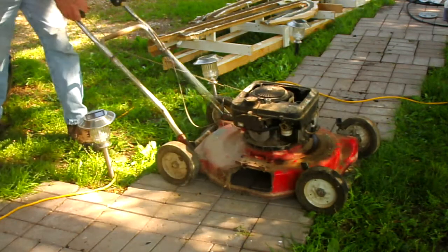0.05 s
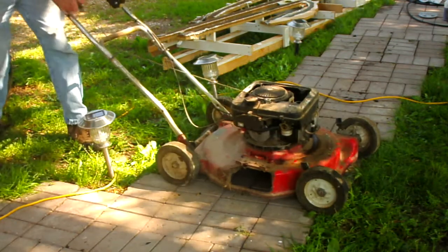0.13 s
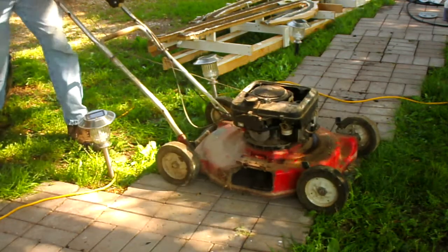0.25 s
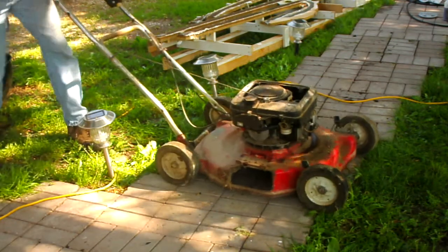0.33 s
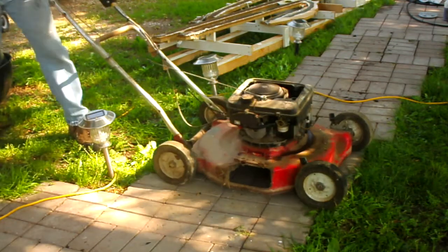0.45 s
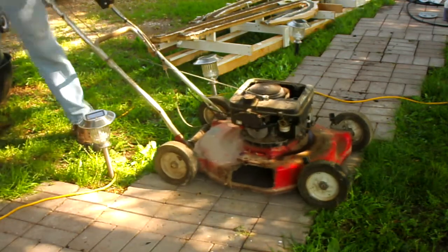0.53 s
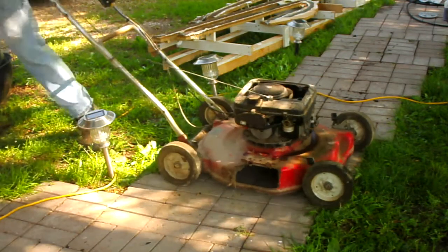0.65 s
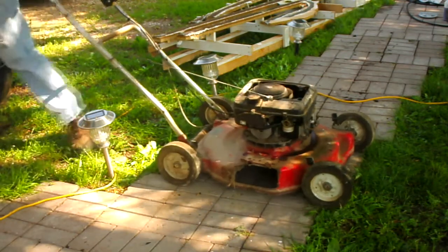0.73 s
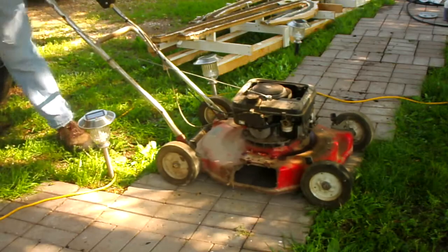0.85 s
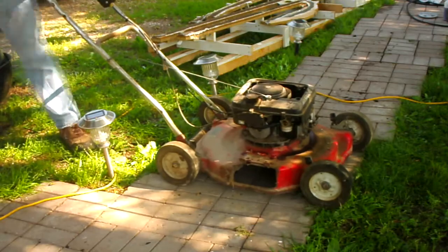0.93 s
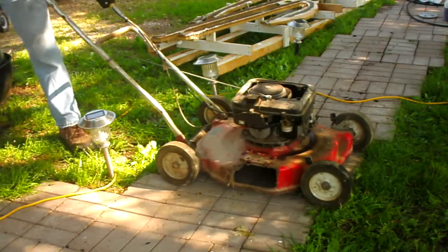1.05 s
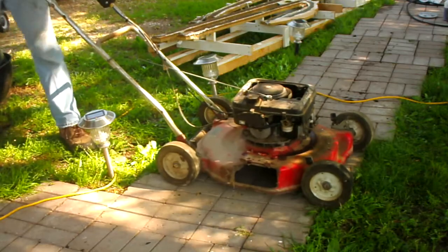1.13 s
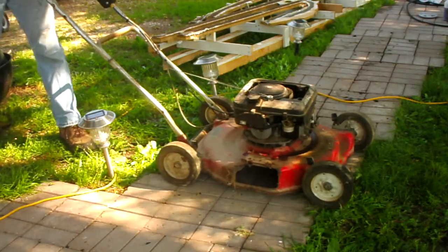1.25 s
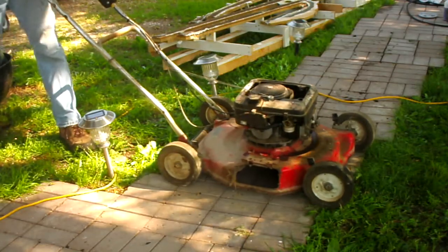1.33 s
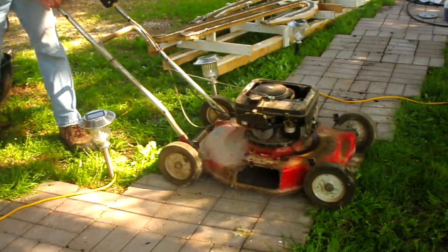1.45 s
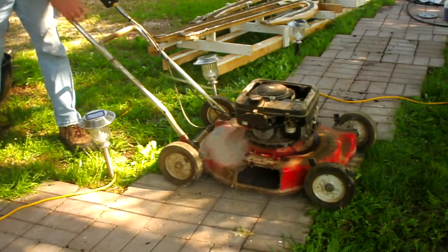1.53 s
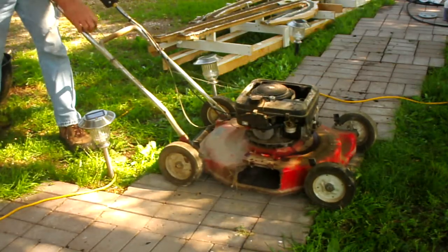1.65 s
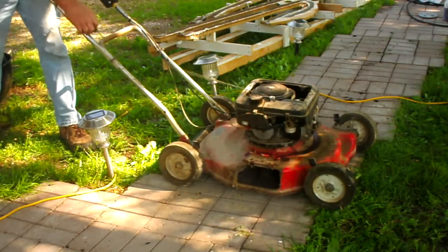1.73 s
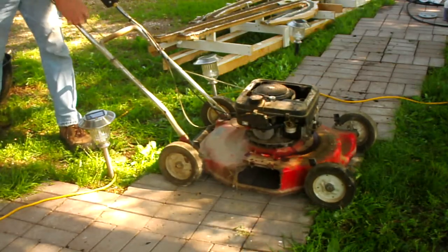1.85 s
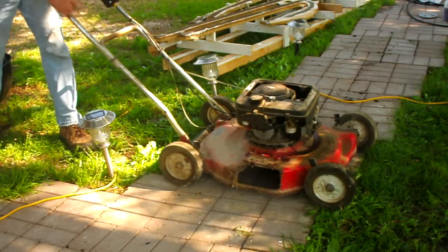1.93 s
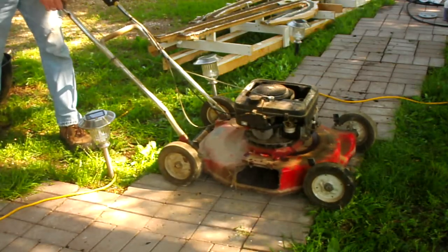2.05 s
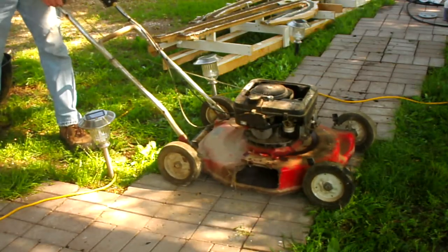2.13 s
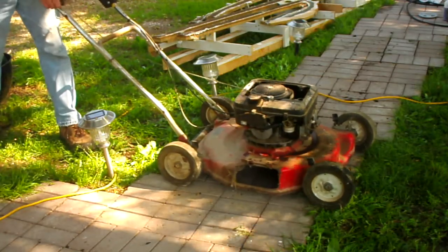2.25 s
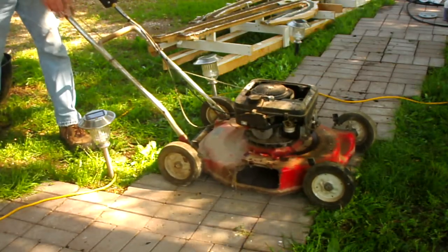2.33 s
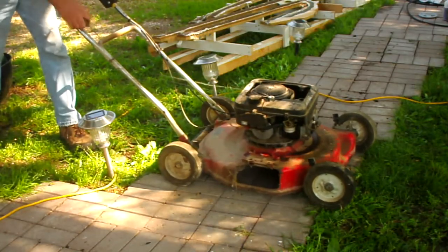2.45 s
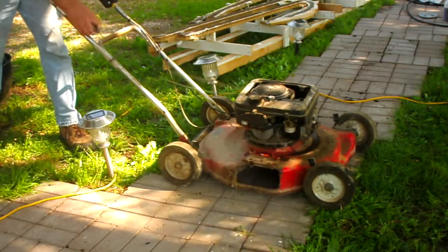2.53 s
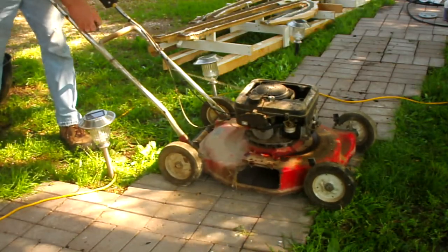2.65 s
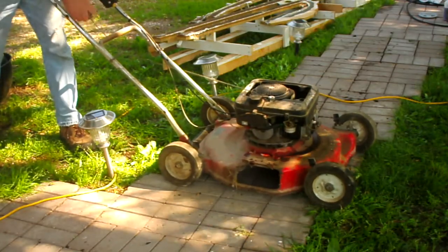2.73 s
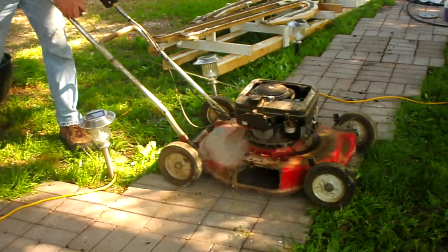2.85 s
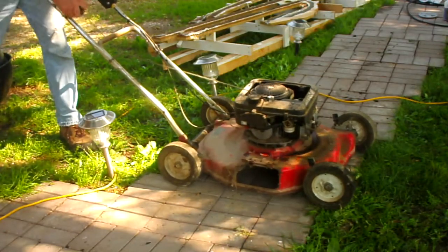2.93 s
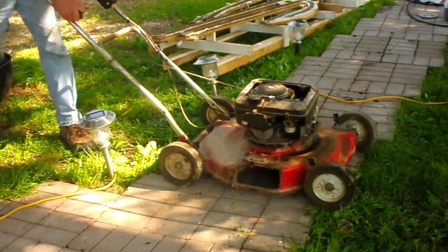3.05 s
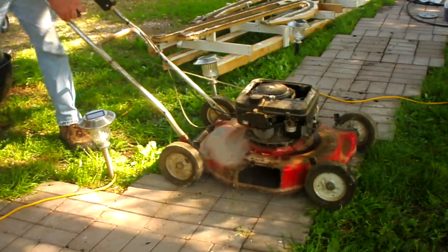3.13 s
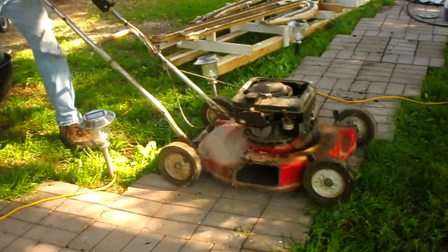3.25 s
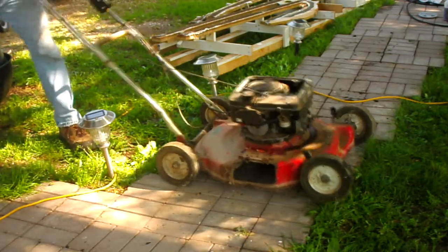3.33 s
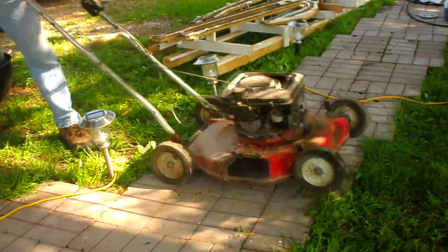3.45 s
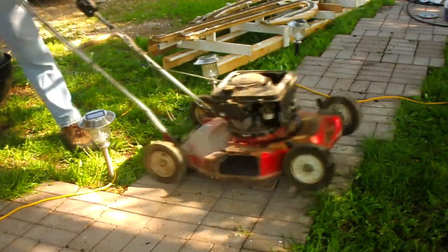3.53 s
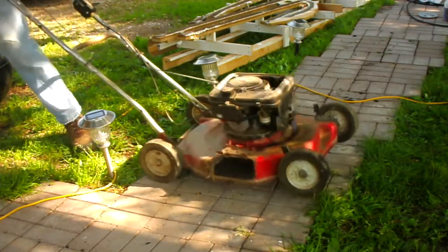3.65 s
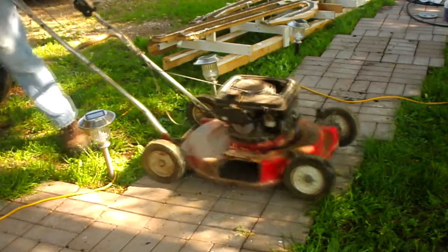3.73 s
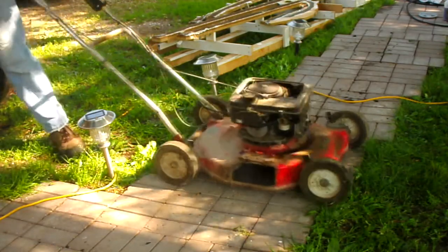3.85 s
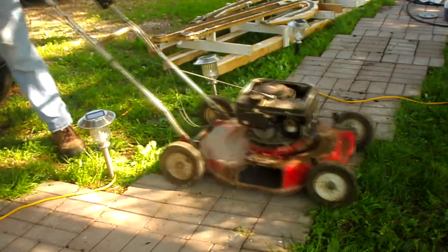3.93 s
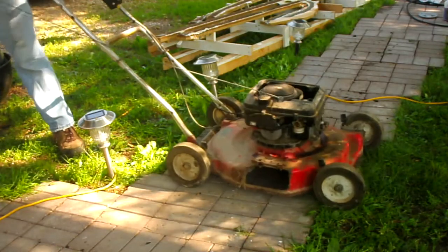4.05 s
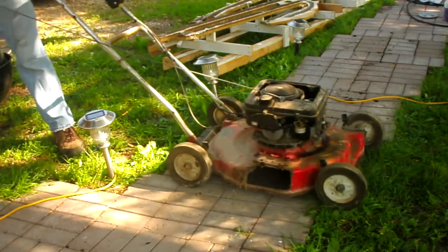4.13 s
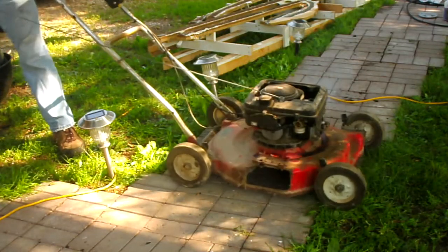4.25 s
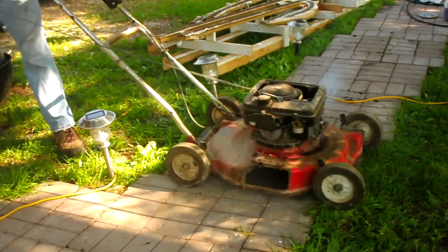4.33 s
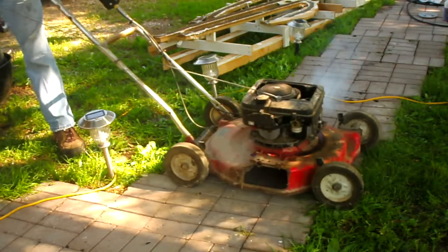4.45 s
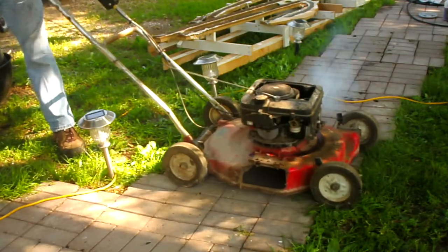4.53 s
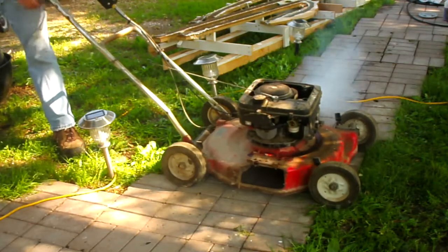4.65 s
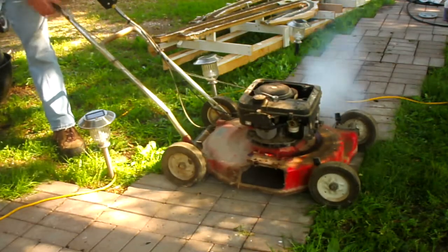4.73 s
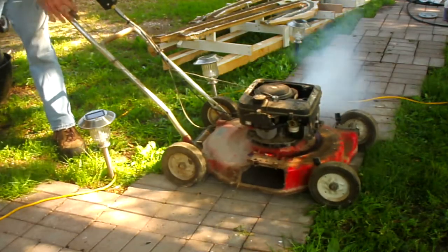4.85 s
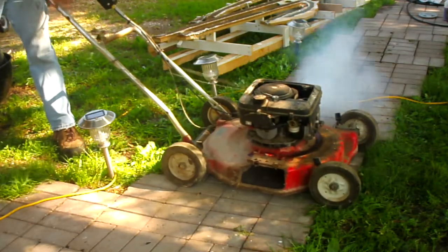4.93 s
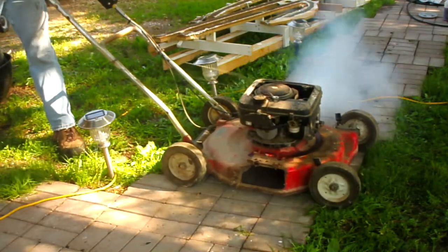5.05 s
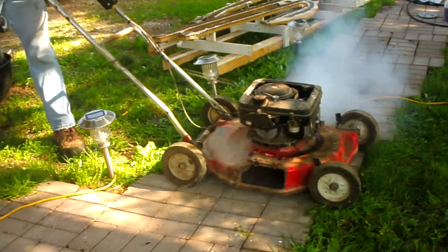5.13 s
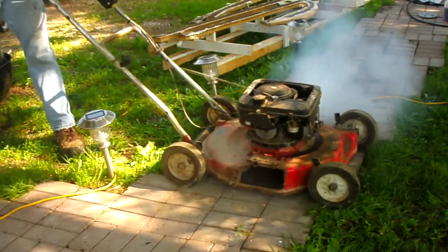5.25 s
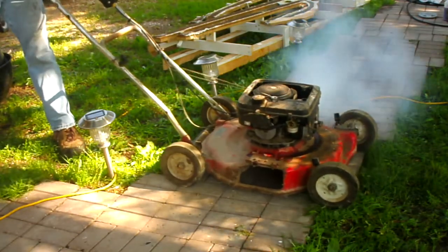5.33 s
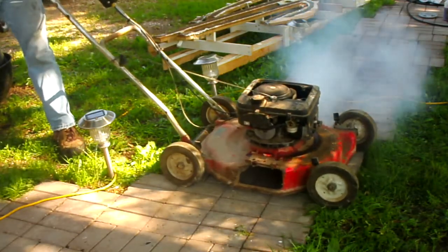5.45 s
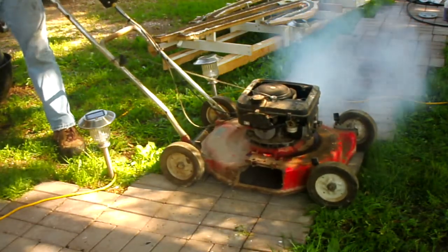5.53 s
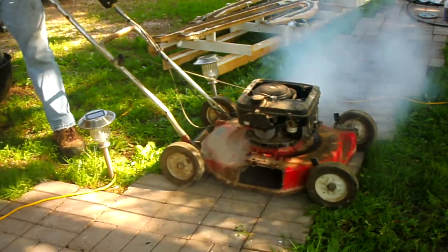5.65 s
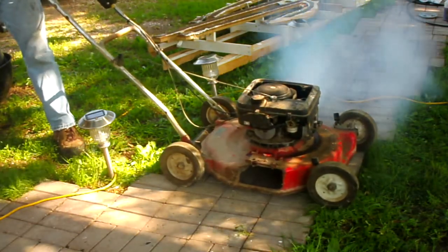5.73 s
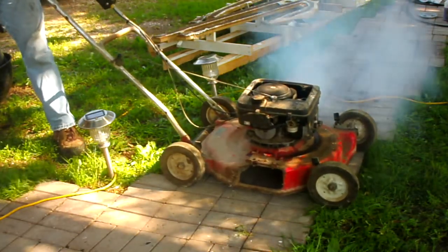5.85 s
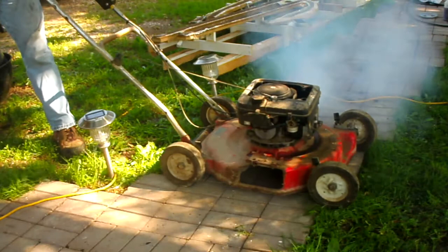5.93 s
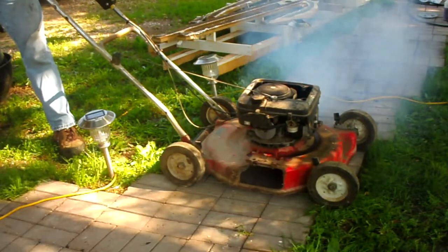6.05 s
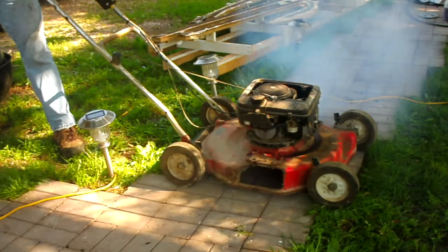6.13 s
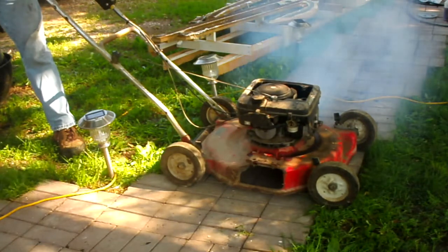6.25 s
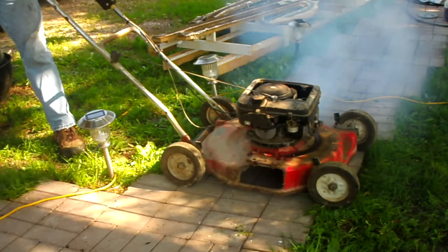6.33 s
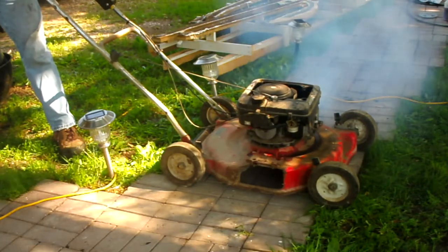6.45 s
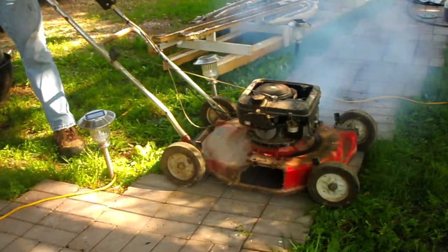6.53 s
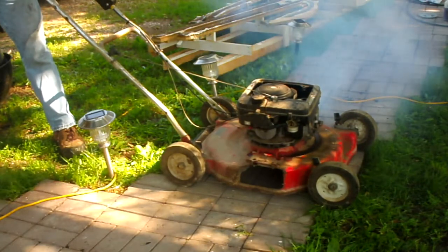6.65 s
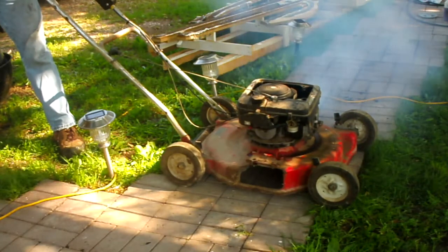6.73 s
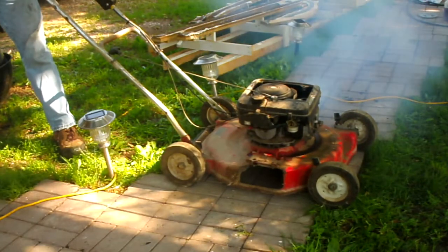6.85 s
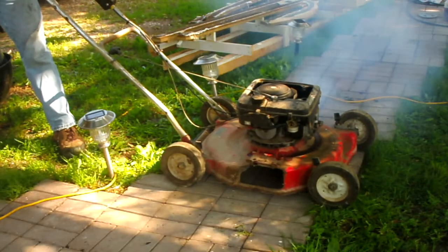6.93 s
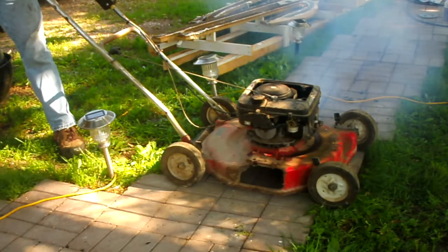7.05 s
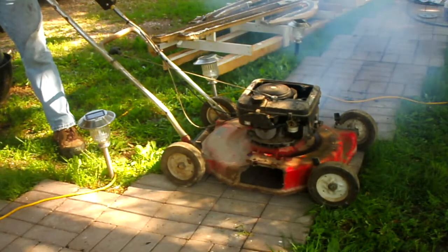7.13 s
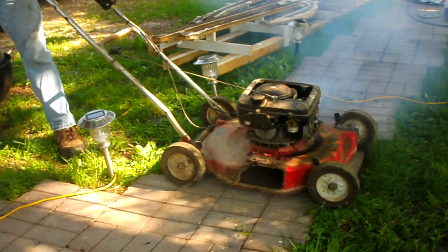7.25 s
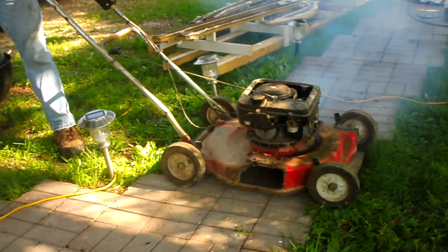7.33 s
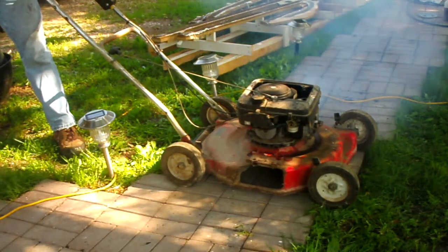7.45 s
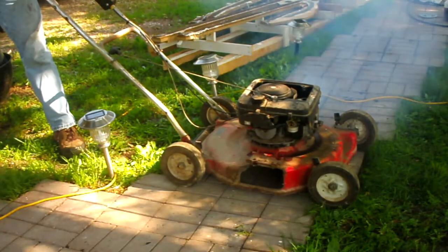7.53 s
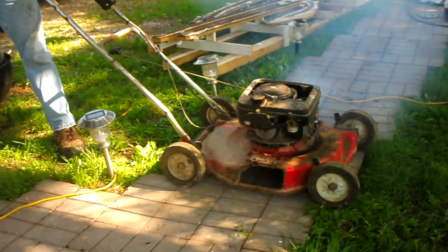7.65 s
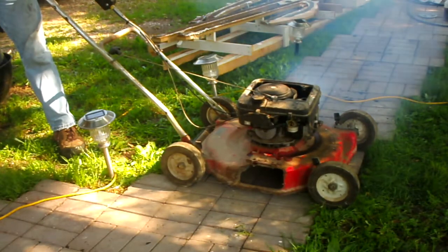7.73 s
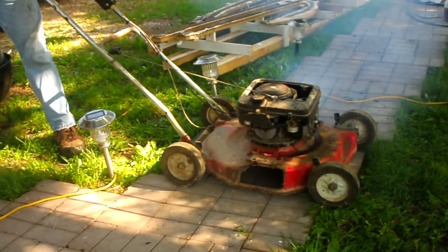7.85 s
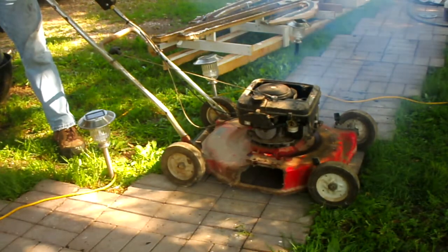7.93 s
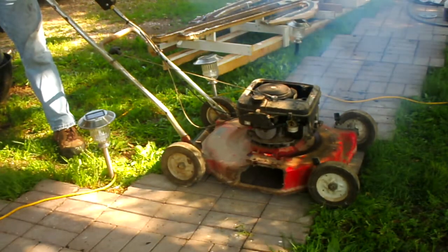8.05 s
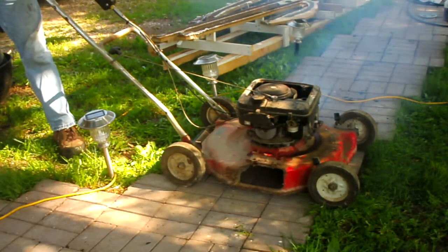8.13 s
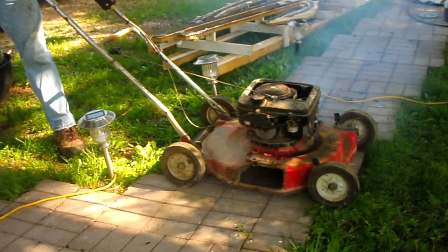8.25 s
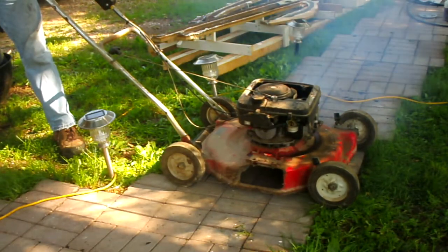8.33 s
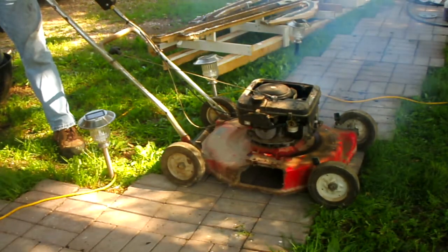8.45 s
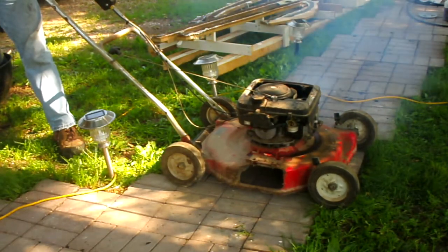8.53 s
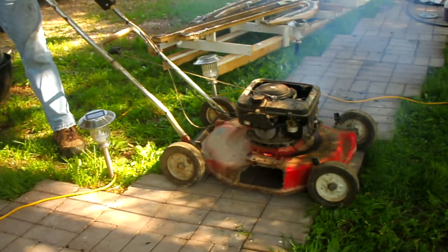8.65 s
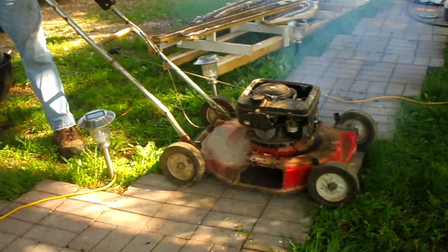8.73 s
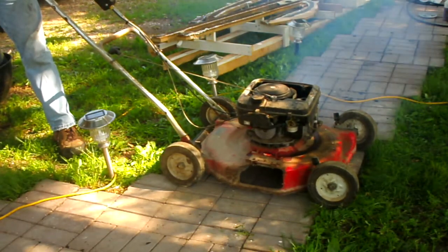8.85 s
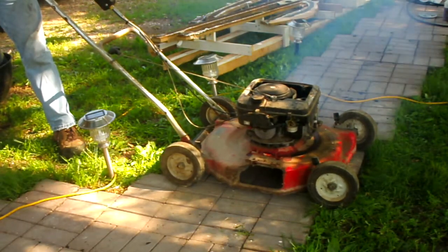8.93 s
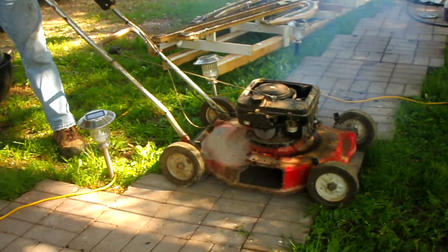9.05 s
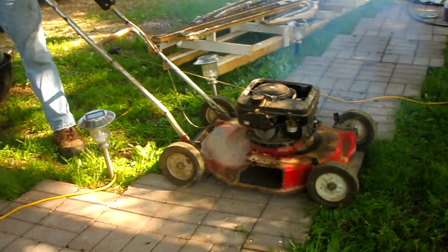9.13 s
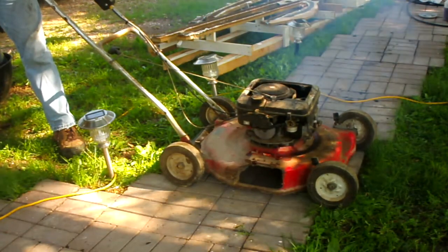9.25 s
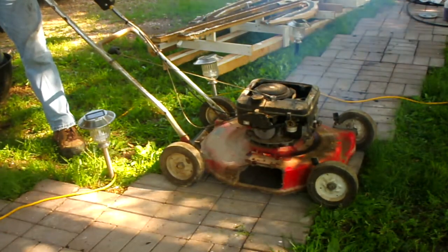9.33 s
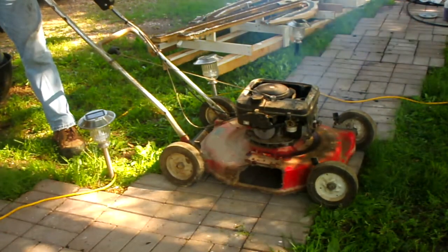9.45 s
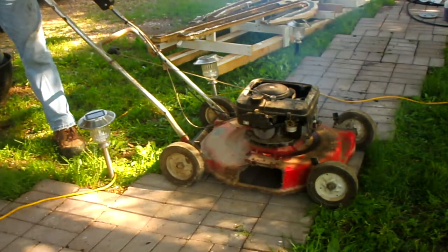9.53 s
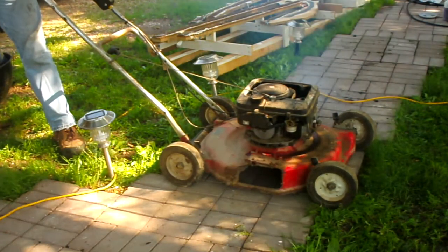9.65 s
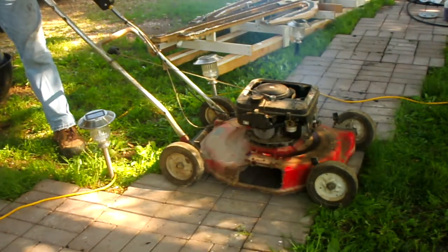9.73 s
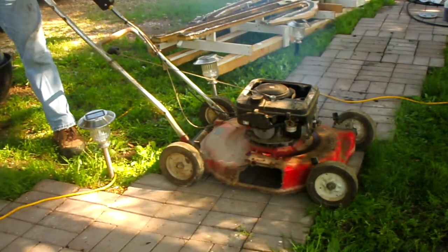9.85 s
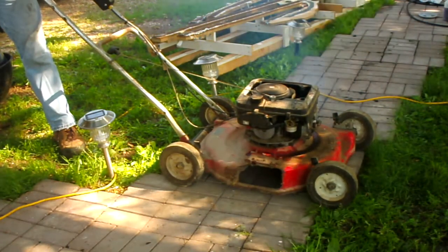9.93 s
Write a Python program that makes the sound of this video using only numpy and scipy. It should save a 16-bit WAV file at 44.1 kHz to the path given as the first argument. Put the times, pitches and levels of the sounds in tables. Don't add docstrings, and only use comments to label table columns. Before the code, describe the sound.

Quiet garden, metallic clacks and ticks from a failed mower start; a second pull catches, chuffing up into a loud droning engine roar that smooths at the end.

```python
import sys
import numpy as np
from scipy import signal
from scipy.fft import rfft, irfft, next_fast_len
from scipy.io import wavfile

SR = 44100
rng = np.random.default_rng(int(sys.argv[2]) if len(sys.argv) > 2 else 0)


def level_to_linear(level):
    exponent = np.asarray(level, float) / 20
    return 10 ** exponent


def unload_wav(signal):
    wavfile.write(
        sys.argv[1],
        SR,
        np.round(np.clip(np.atleast_2d(signal).T, -1, 1) * 32767).astype(np.int16),
    )


N = 440559
T = np.arange(N) / SR

# frequency in Hz, level in dB per Hz.
GAS_HISS = [(900, -46), (1500, -28), (2400, -18), (3800, -8), (4400, -11), (6600, -5), (7400, -8),
            (10000, -11), (12700, -10), (13000, -18), (13600, -10), (14600, -17), (15800, -20)]
# frequency in Hz, width in Hz, height in dB.
PORT_PEAKS = [(4990, 80, 4), (5840, 160, 4), (6520, 260, 7), (7150, 80, 3), (7910, 200, 4), (8440, 160, 4),
              (9720, 300, 5), (10560, 200, 3), (12560, 200, 5), (13700, 250, 3)]


def rms_one(x):
    return x / np.sqrt(np.mean(x ** 2) + 1e-20)


def in_time(rows):
    s, *columns = np.transpose(rows)
    return [np.interp(T, s, c) for c in columns]


def drift(rate_hz):
    r = np.exp(-80 * np.pi * rate_hz / SR)
    draws = rng.standard_normal(N // 40 + 2002)
    slow = signal.lfilter([1], [1, -2 * r, r * r], draws)[2000:]
    return np.interp(np.arange(N) / 40, np.arange(len(slow)), rms_one(slow))


def noise():
    return rng.standard_normal(N)


def band(x, low_hz, high_hz, order=2):
    return signal.sosfilt(signal.butter(order, [low_hz, high_hz], "band", fs=SR, output="sos"), x)


def below(x, hz):
    return signal.sosfiltfilt(signal.butter(2, hz, fs=SR, output="sos"), x)


def colour(x, spectrum, peaks=()):
    size = next_fast_len(N)
    hz = np.maximum(np.arange(size // 2 + 1) * SR / size, 1)
    spectrum_hz, spectrum_db = np.transpose(spectrum)
    shape_db = np.interp(np.log(hz), np.log(spectrum_hz), spectrum_db)
    shape_db = shape_db + sum(db / (1 + (2 * (hz - f) / width) ** 2) for f, width, db in peaks)
    return rms_one(irfft(rfft(x, size) * level_to_linear(shape_db), size)[:N])


def ring(clicks, hz, t60):
    r, w = level_to_linear(-60 / (t60 * SR)), 2 * np.pi * hz / SR
    return signal.lfilter([0, np.sin(w)], [1, -2 * r * np.cos(w), r * r], clicks + 1e-18)


def bump(cycle, centre, width, order=2):
    distance = (cycle - centre + .5) % 1 - .5
    return np.exp(-np.abs(distance / width) ** order)


def hush_and_whine():
    # frequency in Hz, level in dB per Hz.
    hush_spectrum = [(12, -30), (20, 1), (44, -0.5), (123, 5.5), (456, 3), (554, 2.5), (754, 2.5),
                     (7440, -12.5), (8090, -7.5), (8790, -14), (14100, -16.5), (15800, -27)]
    hush = level_to_linear(-43.5 + 1.5 + .5 * drift(2.5)) * colour(noise(), hush_spectrum)
    whine_db = -47.5 - 55 * np.maximum(T - 3.9, 0)
    return hush + np.sqrt(2) * level_to_linear(whine_db) * np.sin(2 * np.pi * 7867.1 * T)


def thuds():
    # start in seconds, peak in dB, pitch in Hz, time to fall 60 dB in seconds.
    soft_hits = [(.27, -36, 60, .15), (.52, -37, 140, .12), (.8, -28, 125, 0.1), (1.22, -42, 70, 0.14),
                 (2.25, -33, 75, .12), (2.325, -36, 90, .08), (2.45, -42, 193, .9), (.86, -19, 1250, 0.05),
                 (1.131, -25, 1200, .07), (1.672, -29.5, 1260, .06), (1.958, -25, 1210, .05),
                 (2.813, -30, 1020, 0.065), (3.161, -29, 390, .08), (1.392, -30, 2020, .06),
                 (1.724, -34, 2020, .06), (1.955, -32, 2020, .05), (.81, -32, 356, .15),
                 (1.09, -35, 356, .15)]
    out, t = np.zeros(N), np.arange(SR) / SR
    for s, db, hz, t60 in soft_hits:
        wobble = level_to_linear(db - 60 * t / t60) * np.minimum(t * hz, 1) * np.sin(2 * np.pi * hz * t)
        out[round(s * SR):][:SR] += wobble
    return out


def all_knocks():
    # start in seconds, peak in dB, pitch in Hz, treble in dB, time to fall 60 dB in seconds.
    slams = [
        (0.238, -1.5, 2140, -38, 0.067),
        (0.733, 1, 2940, -10, 0.062),
        (3.16, -17.5, 1980, -22, 0.05),
        (3.24, 1.5, 1860, -45, 0.076),
        (3.783, 1, 1450, -7, 0.05),
        (3.811, 3, 3140, -30, 0.043),
    ]
    # start in seconds, peak in dB.
    housing_ticks = [(0.311, -27), (0.452, -19), (0.486, -19), (0.531, -15), (0.611, -16), (0.643, -16),
                     (0.687, -16), (0.703, -16), (0.857, -16), (0.943, -24), (1.129, -23), (1.272, -26),
                     (1.67, -30), (1.919, -26), (2.365, -28), (2.812, -24)]
    # start in seconds, peak in dB.
    bar_ticks = [(0.378, -30), (0.401, -21), (0.8, -18), (0.918, -19), (1.047, -18), (1.884, -26),
                 (3.822, -17), (3.945, -21), (3.994, -34)]
    # start in seconds, peak in dB.
    lever_ticks = [(1.391, -17), (1.722, -22), (1.954, -19.5), (2.417, -23), (2.57, -32), (2.743, -23.5)]
    # start in seconds, peak in dB.
    cable_snaps = [(0.839, -31), (1.224, -23), (1.45, -27.5), (3.021, -34), (3.476, -21), (3.601, -26),
                   (3.689, -20)]
    # start in seconds, peak in dB, pitch in Hz.
    clatter = [(4.087, -19, 6130), (4.109, -20, 2160), (4.301, -15, 5930), (4.397, -13.5, 4050),
               (4.521, -8, 6500), (4.563, -9, 1570), (4.654, -18, 2350), (4.711, -9, 4050),
               (4.777, -13, 2740)]

    # pitch in Hz, treble in dB, time to fall 60 dB in seconds
    kinds = [(housing_ticks, (1280, -16, .061)),
             (bar_ticks, (2680, -11, .048)),
             (lever_ticks, (3380, -27, .087)),
             (cable_snaps, (1580, 0, .032)),
             (clatter, (-9, .06))]
    ticks = [(*row, *shared) for rows, shared in kinds for row in rows]
    rows = list(slams)
    for s, db, hz, treble_db, t60 in ticks:
        pitch_stray, treble_stray = rng.standard_normal(2)
        rows.append((s, db, hz * np.exp(.04 * pitch_stray), treble_db + 3 * treble_stray, t60))
    return rows


def knocks():
    # pitch in Hz, level in dB, three times the time to fall 60 dB in
    # seconds.
    frame_tones = [(1350, -29, 0.16), (2940, -1, 0.025), (4560, 6, 0.069), (4780, -5, 0.03),
                   (5520, -10, 0.023), (5880, 4, 0.16), (6400, -11, 0.11), (6660, -22, 0.23),
                   (7180, -10, 0.14), (6780, -3, 0.41)]
    length = 8000
    out, t = np.zeros(N + length), np.arange(length) / SR
    tail = .07 * level_to_linear(-60 * t / .2)
    for s, db, hz, treble_db, t60 in all_knocks():
        fall = level_to_linear(-60 * t / np.clip(t60, .008, .2)) + tail
        burst = rng.standard_normal(length) * np.minimum(t / .0011, 1) * fall
        body = band(burst, hz / 2, hz * 2.42)
        tone = ring(burst, hz, .015)
        crack = band(burst, 3500, 11000, order=1)
        hit = burst * (t < .003)
        frame = 0
        for tone_hz, tone_db, decay in frame_tones:
            frame = frame + level_to_linear(tone_db + 3.4 * rng.standard_normal()) * ring(hit, tone_hz, decay / 3)
        parts = [(body, -1.5), (tone, -9), (crack, treble_db + 3), (frame, -13)]
        knock = sum(level_to_linear(part_db) * part / np.abs(part).max() for part, part_db in parts)
        out[round(s * SR):][:length] += level_to_linear(db) * knock
    return out[:N]


def scrape_clicks():
    hits = rng.random(N) < 2000 / SR
    strength = level_to_linear(2.8 * np.minimum(rng.exponential(1, N), 4))
    return hits * strength * rng.choice([-1, 1], N)


def rope(grab, fastest, let_go, db, rise_db, fall_db):
    slope = np.where(T < fastest, rise_db, fall_db)
    return ((T > grab) & (T < let_go)) * level_to_linear(db - slope * np.abs(T - fastest))


def rope_pulls():
    # grab in seconds, fastest moment in seconds, let go in seconds, whirr in dB, rasp in dB,
    # fall after the fastest moment in dB per second.
    pulls = [
        (0.256, 0.596, 1.7, -30, -32, 25),
        (3.267, 3.7, 4.3, -33, -37, 15),
    ]
    # frequency in Hz, level in dB per Hz.
    whirr_spectrum = [(71, -45), (120, -9.5), (343, -1.5), (521, -13.5), (596, 0.5), (655, -6.5),
                      (1170, -1), (1730, -6), (3000, -10), (3900, -38), (6600, -120)]
    # frequency in Hz, level in dB per Hz.
    rasp_spectrum = [(1060, -34), (1800, -4.5), (3970, 3), (4550, -6), (4890, 1.5), (6600, -1.5),
                     (8910, -5.5), (13500, -19), (15800, -15)]
    # frequency in Hz, width in Hz, height in dB.
    housing_peaks = [(1186, 89, 8), (356, 14, 7)]
    whirr = colour(scrape_clicks(), whirr_spectrum, housing_peaks) * level_to_linear(3 * drift(35))
    rasp = colour(scrape_clicks(), rasp_spectrum) * level_to_linear(3 * drift(40))
    out = np.zeros(N)
    for grab, fastest, let_go, whirr_db, rasp_db, fall_db in pulls:
        out += rope(grab, fastest, let_go, whirr_db, 32, fall_db) * whirr
        out += rope(grab, fastest, let_go, rasp_db, 22, fall_db) * rasp
    return out


def spring_creep():
    # middle in seconds, level in dB, half length in seconds.
    creeps = [(0.407, -38, 0.0099), (1.065, -37, 0.042), (1.295, -41, 0.058), (1.534, -44.5, 0.12),
              (3.41, -40, 0.029), (3.584, -34, 0.012), (3.843, -34, 0.013)]
    # frequency in Hz, level in dB per Hz.
    spring_spectrum = [(2000, -34), (2600, 0), (5000, -3), (9000, 0), (9600, -20), (15000, -30)]
    # frequency in Hz, width in Hz, height in dB.
    spring_peaks = [(2680, 60, 15), (3330, 60, 12), (3880, 80, 9), (5100, 80, 9), (5800, 70, 17),
                    (6450, 90, 14), (7540, 60, 5), (8150, 70, 7), (8720, 100, 9)]
    level = sum(level_to_linear(db) * np.exp(-((T - s) / half) ** 4) for s, db, half in creeps)
    return level * colour(scrape_clicks(), spring_spectrum, spring_peaks)


def dead_puffs():
    # middle in seconds, peak in dB, length in seconds.
    puffs = [
        (0.561, -19, 0.011),
        (0.976, -27.5, 0.018),
    ]
    level = sum(level_to_linear(db) * np.exp(-((T - s) / length) ** 2) for s, db, length in puffs)
    return level * colour(noise(), GAS_HISS, PORT_PEAKS)


def blade_wash(cycle, loaded):
    # frequency in Hz, level in dB per Hz.
    wash_spectrum = [(30, -46), (90, -36), (170, -15.5), (230, -11), (400, -9.5), (560, -7.5), (700, -10.5),
                     (960, -10), (1460, -5), (2200, -10.5), (3100, -13.5), (4300, -16.5), (6700, -20.5),
                     (15800, -33.5)]
    # frequency in Hz, width in Hz, height in dB.
    deck_peaks = [(1450, 53, 2.5), (6680, 250, 4), (863, 99, 4), (2680, 460, 3.5), (1900, 160, 1.5)]
    air = colour(noise(), wash_spectrum, deck_peaks)
    body = below(air, 1900)
    treble = air - body
    body_db = 1.9 * np.cos(8 * np.pi * (cycle - .21)) + np.cos(16 * np.pi * (cycle - .02))
    treble_db = 3.2 * np.cos(8 * np.pi * (cycle - .16))
    slow = np.clip(1 - np.gradient(cycle) * SR / 21, 0, 1)
    stroke = 2 * np.pi * (cycle - .9)
    chug = level_to_linear(slow * (4 * np.cos(stroke) + 5 * np.cos(2 * stroke) + 5 * drift(25)))
    body = body * chug * level_to_linear(loaded * body_db + .63 * drift(20))
    treble = treble * chug * level_to_linear(loaded * treble_db + .5 * drift(6))
    return body + np.where(loaded, level_to_linear(-1), 1) * treble


def blade_drone(cycle, loaded):
    # multiple of the cycle rate, level under load in dB, level when coasting in dB.
    blade_tones = [(2.03, -29, -24), (4, -15.5, -15), (8.13, -2.5, 3), (12.13, -0.5, 5.5), (16, -16, -24),
                   (20.5, -8.5, -6), (23.8, -4.5, -2), (28, -11.5, -26), (40, -19, -32), (32.32, -4, -2),
                   (35.53, -5.5, -2), (44.3, -9.5, -30), (48.1, -13, -30), (51.4, -9, -30), (60, -7, -9)]
    # frequency in Hz, level in dB.
    deck_response = [(70, 0), (86, -8), (95, -2), (150, -14), (186, 1.5), (212, -4.5), (240, 2.5),
                     (300, -1), (400, -10), (500, 2.5), (620, -3), (740, -5.5), (850, 0), (1300, -7.5),
                     (1450, 0)]
    deck_hz, deck_db = np.transpose(deck_response)
    out, rate = 0, np.gradient(cycle) * SR
    for k, loaded_db, coast_db in blade_tones:
        waver_db = (.5 + .03 * k) * drift(6)
        waver_rad = .015 * k * drift(4)
        level_db = np.where(loaded, loaded_db, coast_db) + waver_db + np.interp(k * rate, deck_hz, deck_db)
        out = out + level_to_linear(level_db) * np.cos(2 * np.pi * round(k) * (cycle - .025) + waver_rad)
    return out


def exhaust_thump(cycle):
    # pitch in Hz, level in dB, time to fall 60 dB in seconds.
    muffler_tones = [(123.6, -1.5, 0.095), (247, -12, 0.098), (340, -3, 0.18), (416, -26, 0.024)]
    misfires = [6.85, 7.93, 8.36, 8.45]
    firings = np.flatnonzero(np.diff(np.floor(cycle - .9)) > 0)
    clicks = np.zeros(N)
    clicks[firings] = level_to_linear(.8 * rng.standard_normal(len(firings)))
    missed = firings[np.searchsorted(firings, np.array(misfires) * SR)]
    clicks[missed] *= -.3
    rings = 0
    for k, (hz, db, t60) in enumerate(muffler_tones):
        rings = rings + (-1) ** k * level_to_linear(db) * ring(clicks, hz, t60)
    return rms_one(signal.sosfilt(signal.butter(4, 88, "high", fs=SR, output="sos"), rings))


def exhaust_chuff(cycle, loaded):
    speed = np.clip(np.gradient(cycle) * SR / 24, 0, 1)
    firing = np.clip(cycle + .5, 0, 399).astype(int)
    strength = level_to_linear(.82 * rng.standard_normal(400))[firing]
    gate = bump(cycle, .96 + .015 * (1 - speed), .055 + .095 * speed, order=2 + speed)
    gate = gate * (1 + .33 * bump(cycle, .088, .05))
    gate = gate + .3 * bump(cycle, .6, .07)
    hiss = colour(noise(), GAS_HISS, PORT_PEAKS)
    slow = np.clip(1.25 - 1.25 * speed, 0, .8)
    resonant = colour(noise(), GAS_HISS, PORT_PEAKS + PORT_PEAKS[:8])
    hiss = np.sqrt(1 - slow) * hiss + np.sqrt(slow) * resonant
    dull = below(hiss, 10500)
    hiss = dull + np.clip(2.5 * speed - .2, 0, .9) * (hiss - dull)
    cough = level_to_linear(-14) * bump(cycle, .93, .13) * band(noise(), 280, 1700)
    pop = rms_one(band(noise(), 140, 400))
    pop = level_to_linear(-2) * speed * (1 - speed) * bump(cycle, .1, .28) * pop
    hoot = rms_one(ring(noise(), 356, .12))
    hoot = level_to_linear(-8 + 6) * speed * (1 - speed) ** 2 * bump(cycle, .6, .22) * hoot
    return np.where(loaded, strength * (rms_one(gate) * hiss + cough + pop + hoot), hiss)


def engine():
    # time in seconds, four-stroke cycles per second.
    crank_speed = [(3.535, 4.526), (4.0, 6.852), (4.3, 10.898), (4.6, 12.622), (5.0, 19.396),
                   (5.15, 18.714), (5.3, 21.045), (5.95, 23.686), (6.65, 24.734), (6.9, 23.891),
                   (7.1, 24.259), (7.55, 23.668), (8.25, 24.108), (8.55, 23.667), (8.95, 24.155),
                   (9.15, 23.628), (10.0, 23.71)]
    # time in seconds, level in dB.
    throttle = [(3.55, -31.5), (3.73, -25), (4.05, -23.5), (4.4, -20.5), (4.53, -18), (5.1, -19),
                (5.6, -20.5), (6.7, -22), (9.24, -23)]
    first_chuff_s, release_s = 3.535, 9.238
    speed = in_time(crank_speed)[0]
    cycle = np.cumsum(speed) / SR
    cycle = cycle - cycle[round(first_chuff_s * SR)]
    loaded = T < release_s
    turning = np.clip((T - 3.3) / .22, 0, 1)

    def level(full_db, db_per_doubling, coast_db):
        return level_to_linear(np.where(loaded, full_db + db_per_doubling * np.log2(speed / 24), coast_db))

    out = level(-11.5, 15.05, -17.5) * blade_wash(cycle, loaded)
    out += level_to_linear(-5) * level(-13, 19.8, -19) * blade_drone(cycle, loaded)
    out += level(-32, 7.4, -31) * exhaust_thump(cycle)
    chuff_db = np.where(loaded, in_time(throttle)[0], -29.5)
    out += level_to_linear(chuff_db) * exhaust_chuff(cycle, loaded)
    return turning * out


def scene():
    handling = thuds() + knocks()
    starter = rope_pulls() + spring_creep() + dead_puffs()
    return (hush_and_whine() + handling + starter + engine())[None]


def band_limit(x):
    return signal.sosfilt(signal.butter(12, 16250, fs=SR, output="sos"), x)


def record(dry):
    low_pass = signal.ellip(14, .2, 95, 15680, fs=SR, output="sos")
    mix = signal.sosfilt(low_pass, np.clip(dry, -1, 1))
    return band_limit(np.clip(mix, -1, 1))


dry = scene()
out = record(dry)
unload_wav(out)
```